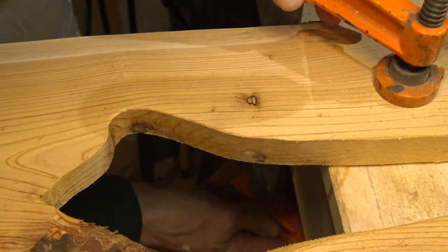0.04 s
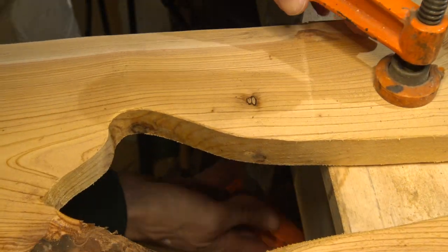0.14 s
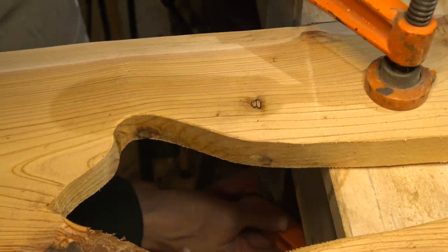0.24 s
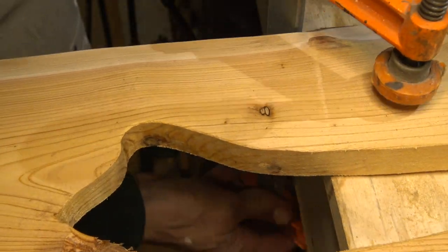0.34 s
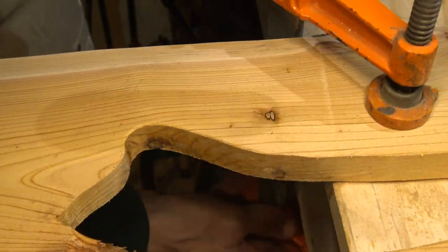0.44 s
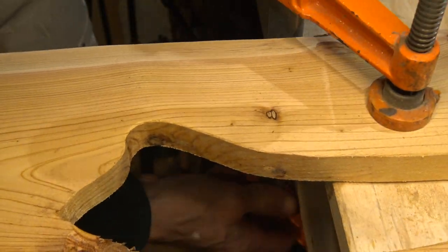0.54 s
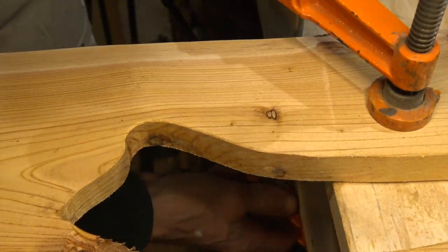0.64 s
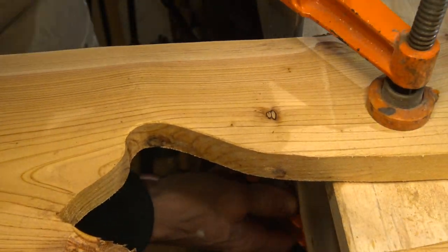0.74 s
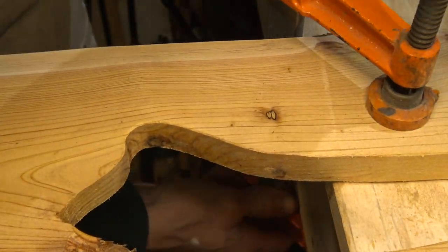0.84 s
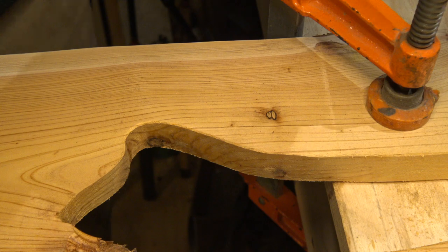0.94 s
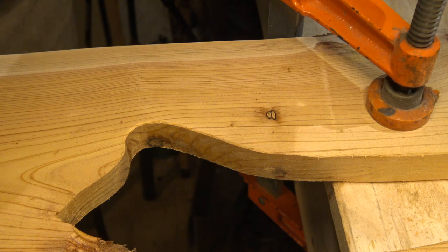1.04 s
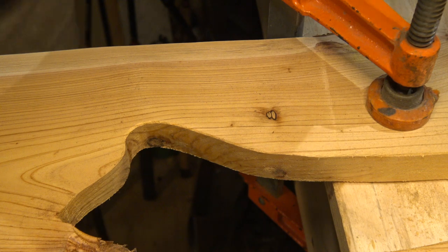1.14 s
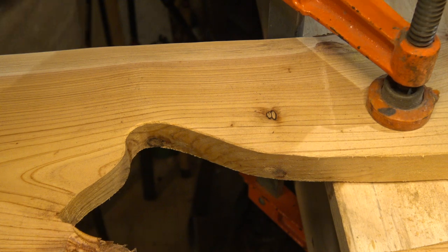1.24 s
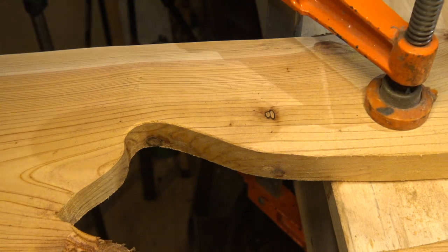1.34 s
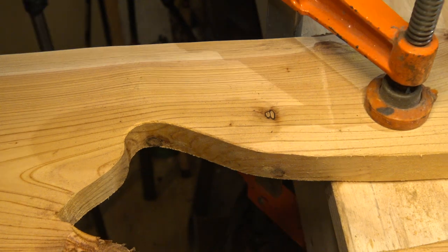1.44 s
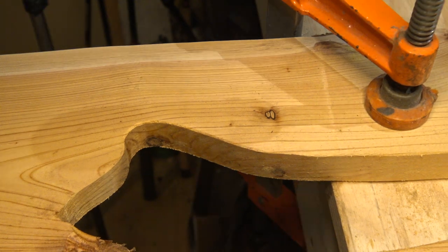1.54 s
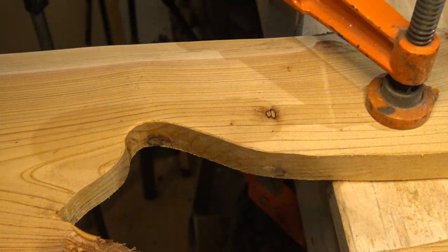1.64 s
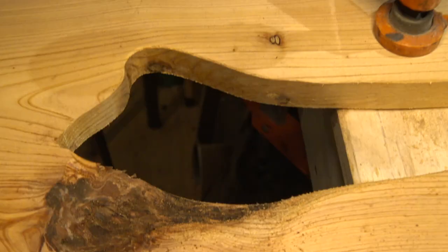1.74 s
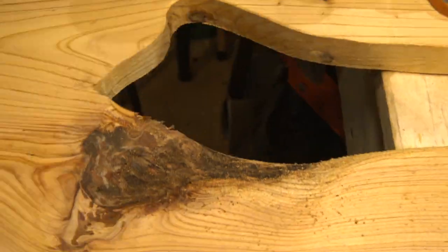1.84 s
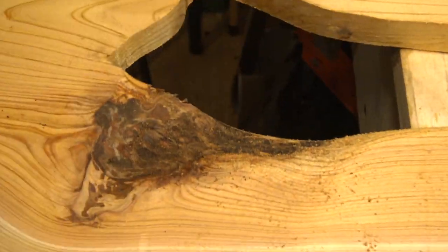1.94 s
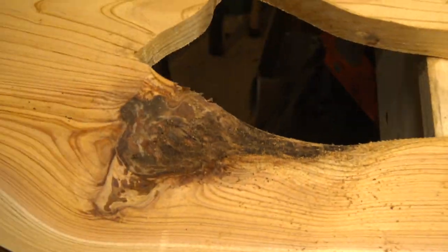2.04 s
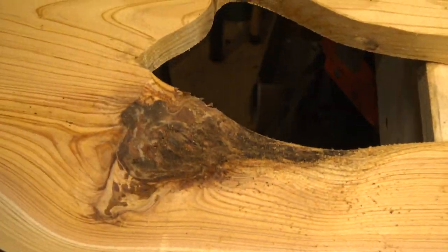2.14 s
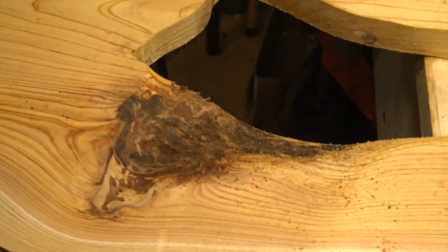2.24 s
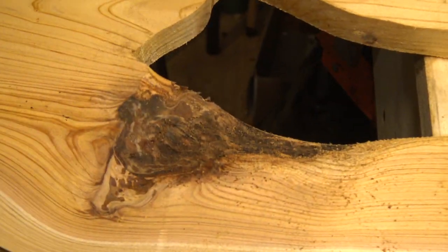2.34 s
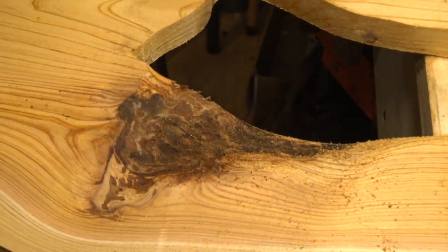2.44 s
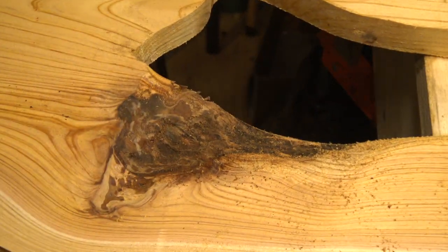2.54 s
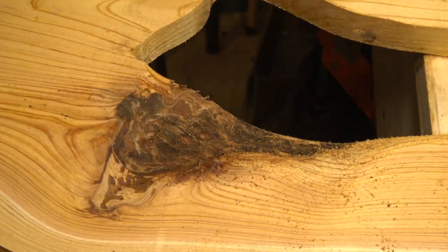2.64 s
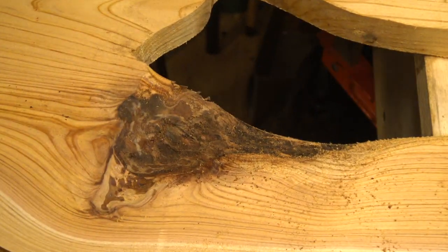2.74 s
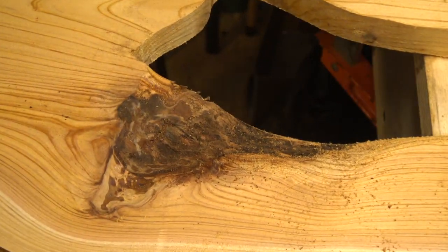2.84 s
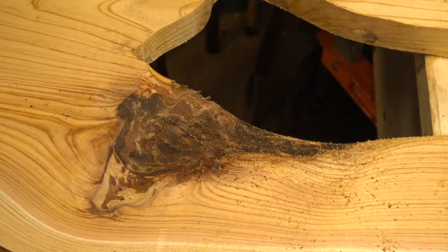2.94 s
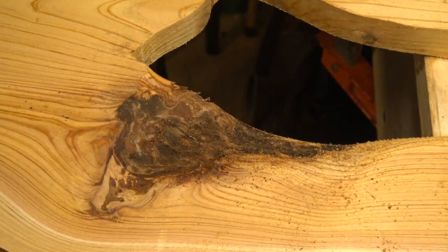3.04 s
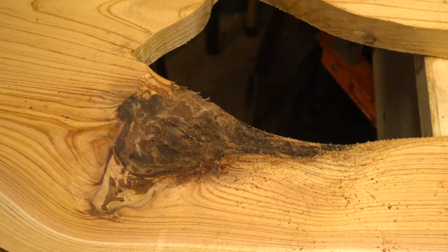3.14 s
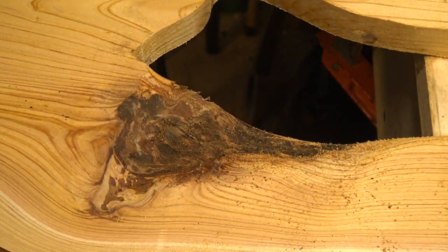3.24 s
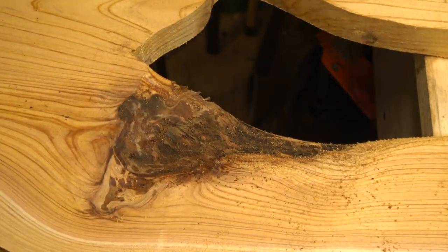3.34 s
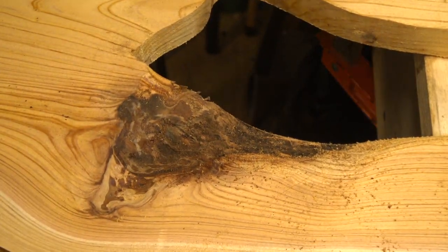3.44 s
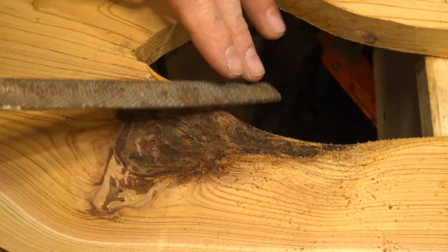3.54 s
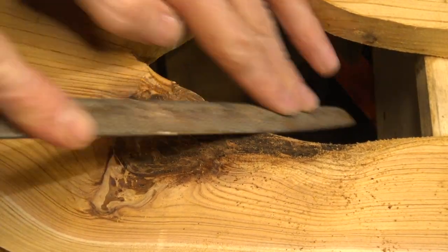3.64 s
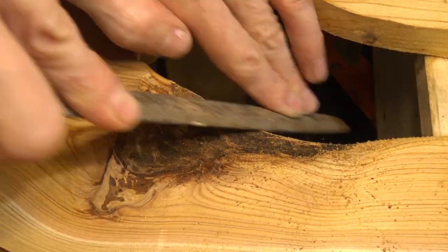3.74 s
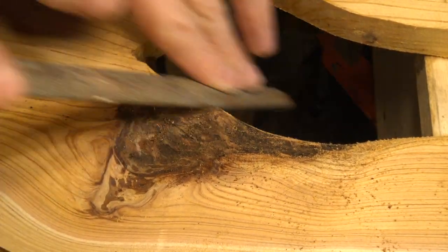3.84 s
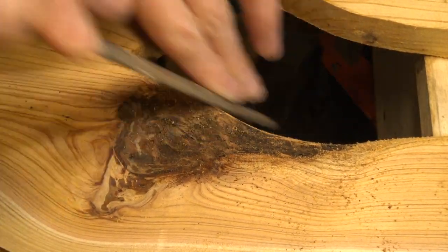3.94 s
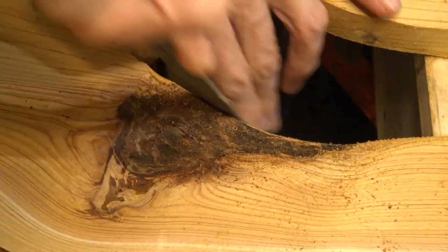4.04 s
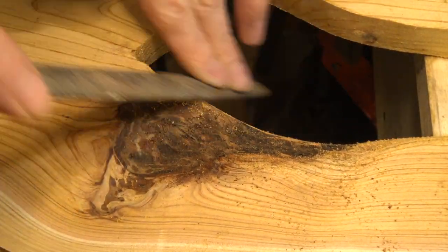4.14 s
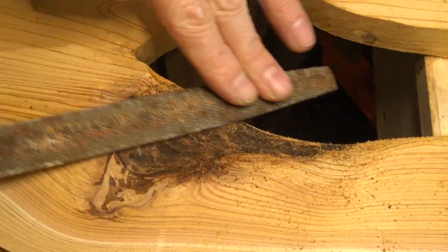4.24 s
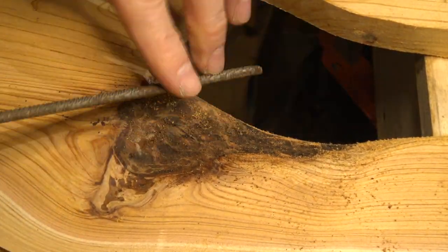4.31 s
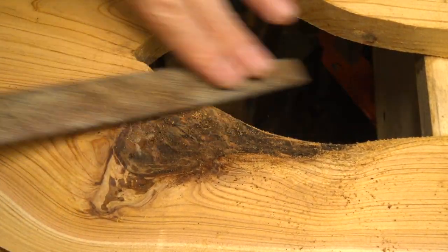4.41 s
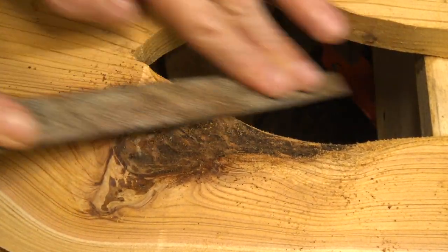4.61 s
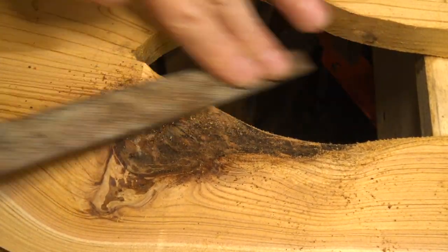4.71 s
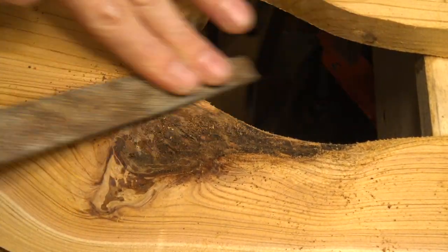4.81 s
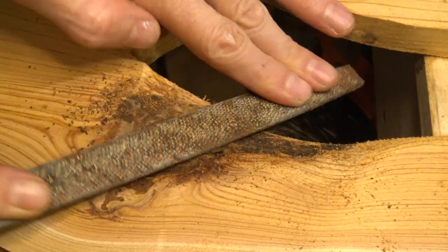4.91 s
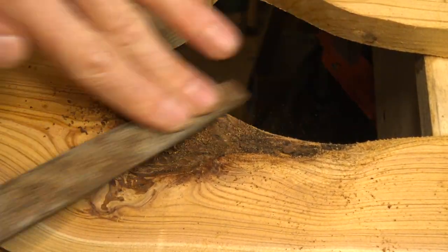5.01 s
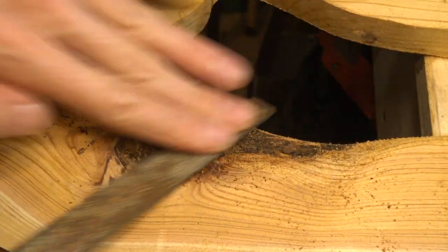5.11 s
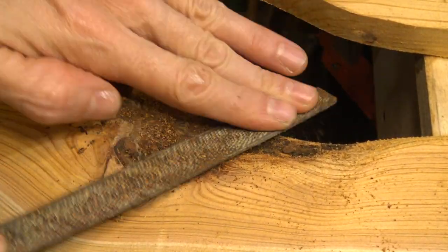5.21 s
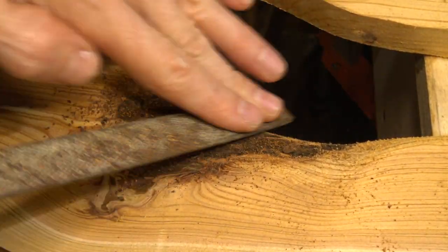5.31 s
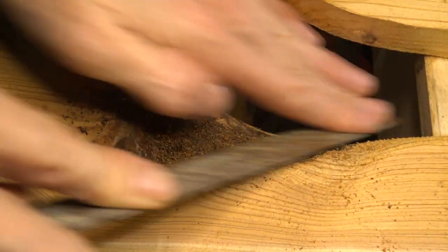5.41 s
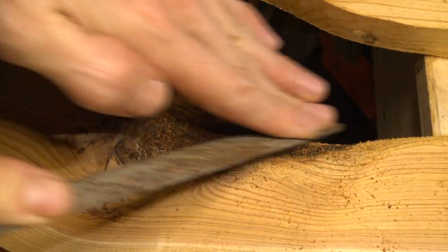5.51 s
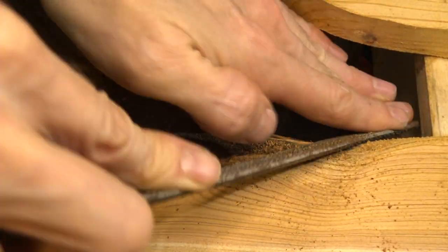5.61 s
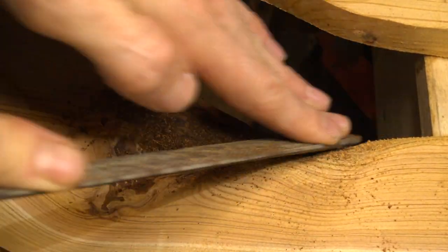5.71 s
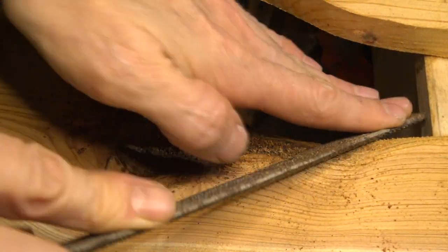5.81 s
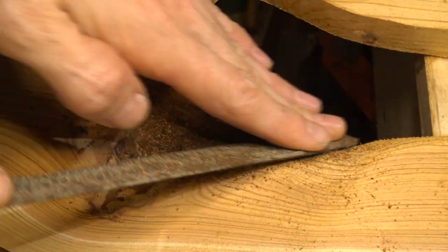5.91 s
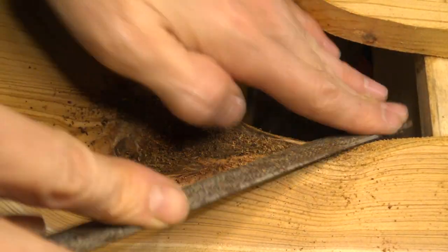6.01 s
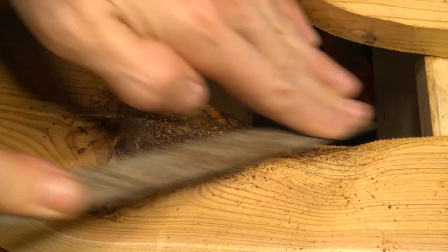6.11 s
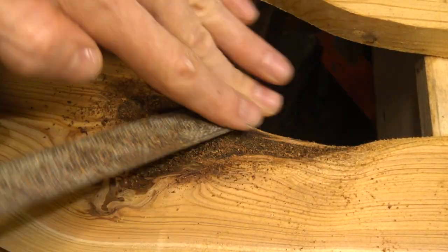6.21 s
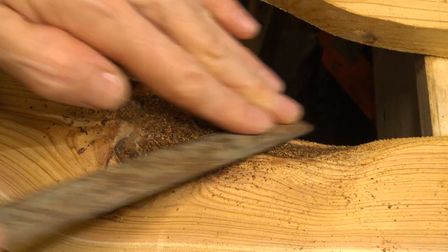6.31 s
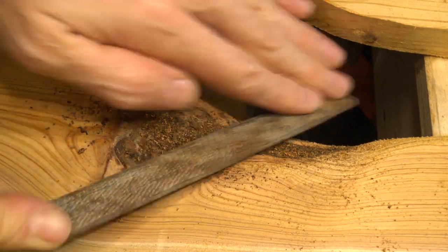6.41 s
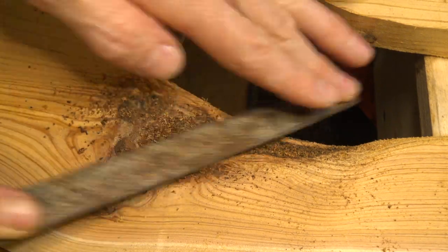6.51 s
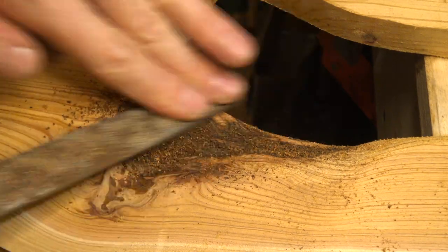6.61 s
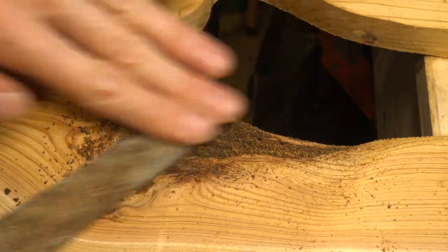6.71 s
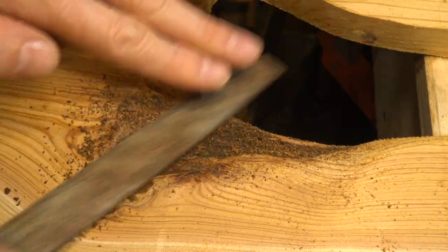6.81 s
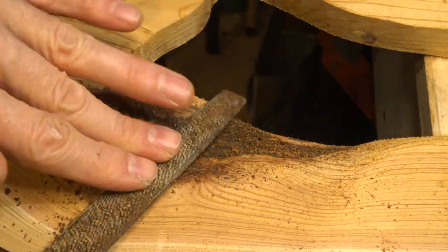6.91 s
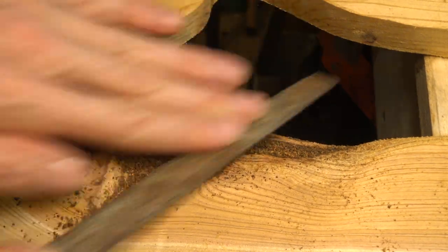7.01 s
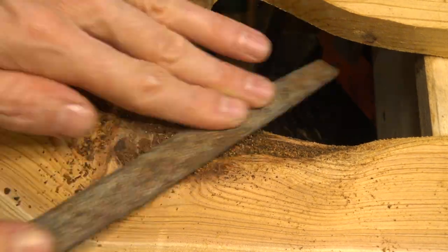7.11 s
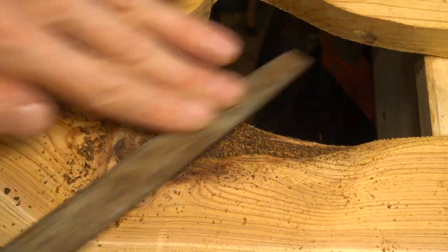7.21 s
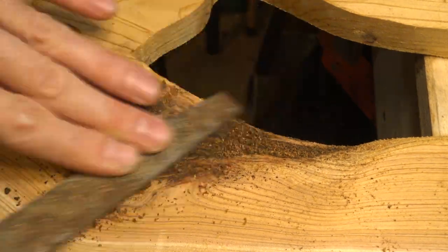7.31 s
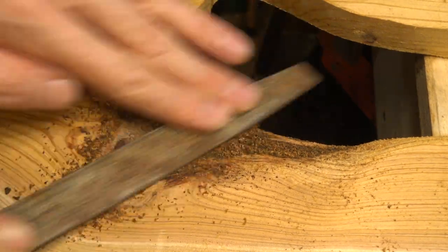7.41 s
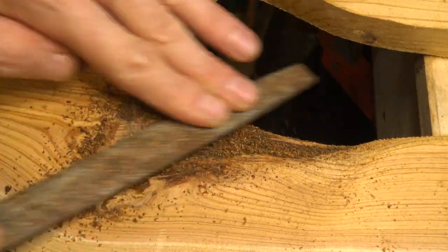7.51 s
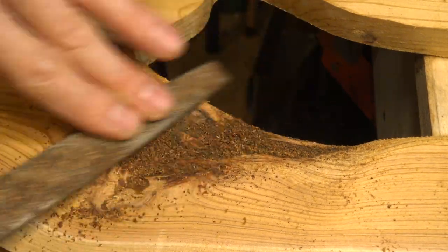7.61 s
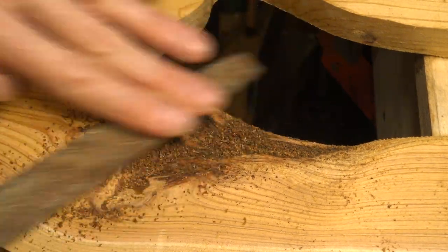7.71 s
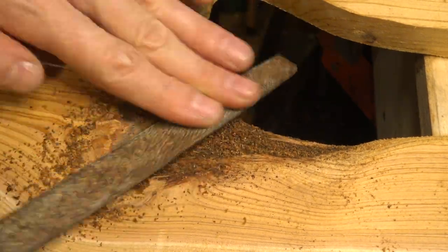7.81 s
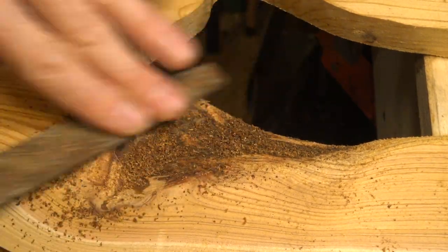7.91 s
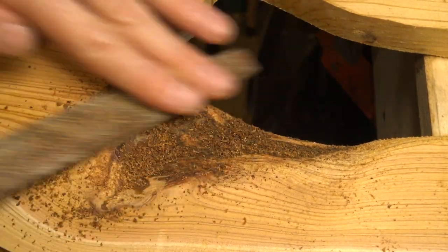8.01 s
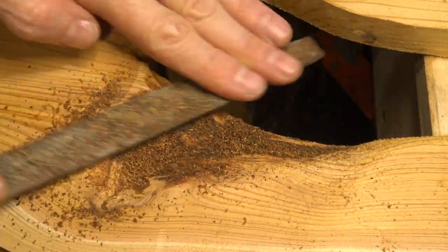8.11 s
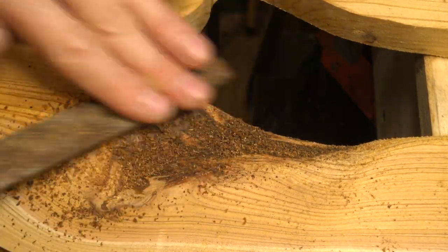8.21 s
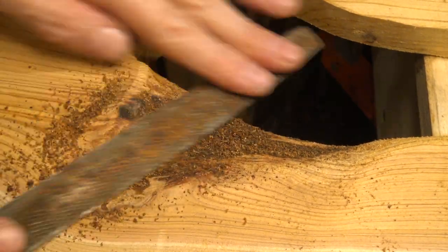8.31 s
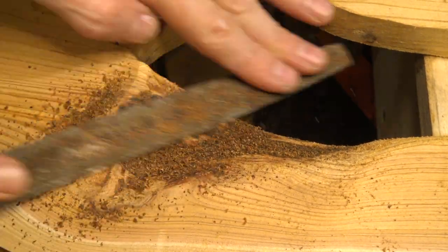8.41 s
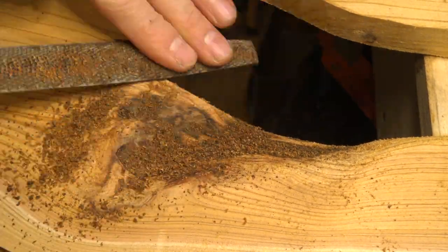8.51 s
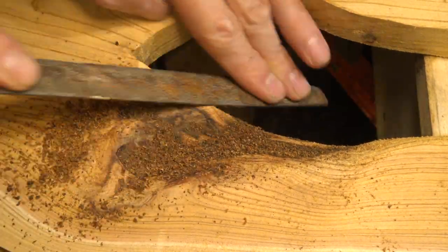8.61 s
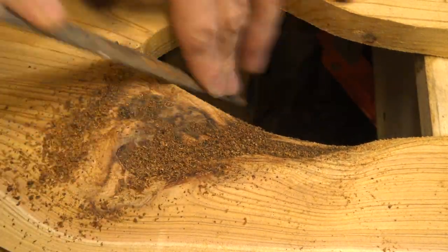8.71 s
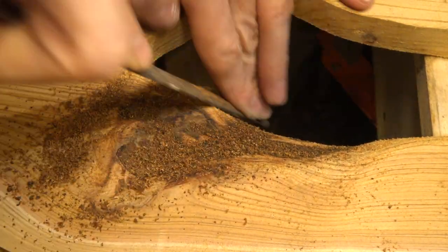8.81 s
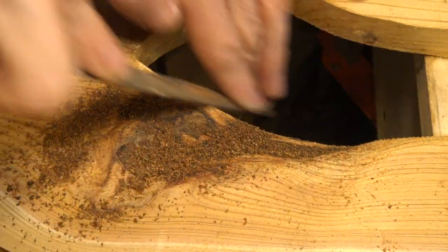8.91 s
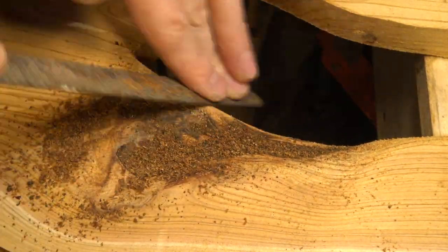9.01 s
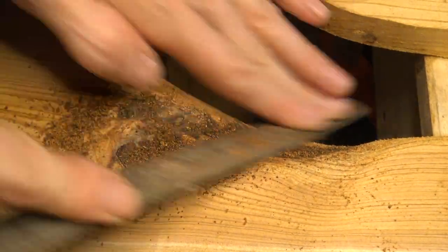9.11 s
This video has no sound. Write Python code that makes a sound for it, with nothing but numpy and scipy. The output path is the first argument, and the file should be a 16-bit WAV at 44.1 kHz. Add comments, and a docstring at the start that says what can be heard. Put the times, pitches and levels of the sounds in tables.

```python
"""Soft workshop air and a steady whine, then a clamp knocked into place on a wooden board, its screw creaking tight.
After a lull a hand file rasps a knot in the board, very fast: about 23 times a second to and fro.
Each push fizzes and ends in a thump of the board, each pull scrapes more dully.
The rasp, thumps, knocks and air are noise coloured by resonances or spectra; the whine is a stack of wavering sines.
A close pair of microphones hears it all, with a short scatter of reflections from the room."""
import sys
import numpy as np
from scipy import signal
from scipy.fft import rfft, irfft, next_fast_len
from scipy.io import wavfile
from scipy.ndimage import uniform_filter1d, minimum_filter1d

SR = 44100
rng = np.random.default_rng(int(sys.argv[2]) if len(sys.argv) > 2 else 0)


def store_wav(level_fs):
    """Save 16-bit WAV to argv[1]."""
    pcm = np.round(np.clip(np.atleast_2d(level_fs), -1, 1) * 32767)
    wavfile.write(sys.argv[1], SR, pcm.T.astype(np.int16))


N = 403515
TIME = np.arange(N) / SR
TAPS = 8192  # length of the filters, in samples
HZ = np.fft.rfftfreq(TAPS, 1 / SR)
CATCH_AT = .46  # share of a push-and-pull cycle at which the teeth catch

# ringing of the clamp under strain, as a spectrum: pitch_hz, level_db
CREAK_SPECTRUM = [(700, -40), (1150, -14), (1700, -2.5), (2150, 5.5), (2450, 1.5), (2900, -13),
                  (4400, -20.5), (5500, -12), (6400, -44)]
# resonances of the file on the wood: pitch_hz, half_width_hz, level_db
FILE_MODES = [(1010, 410, -19), (1532, 162, -5.5), (2060, 230, -3.5), (2413, 170, -7), (2904, 87, -8),
              (3381, 37, -1), (3520, 35, -4), (3690, 330, -9), (4799, 242, 1), (5300, 22, -14),
              (5390, 220, 2.5), (6040, 270, -2), (6200, 190, -5), (7100, 480, -4.5), (7915, 226, -4.5),
              (9200, 670, -13), (9230, 470, -11.5), (9730, 180, -4), (10500, 190, -9), (11200, 1900, -15),
              (14800, 3900, -11.5), (13900, 64, -20), (16100, 195, -10)]
# resonances of the clamped board: pitch_hz, half_width_hz, level_db
BOARD_MODES = [(50, 130, -54.5), (92.2, 2.7, -23), (167, 15, -26), (211, 15, -21), (293, 19.8, 0.5),
               (354, 48, -5), (432, 52, -2), (545, 31.3, 1.5), (663, 118, -7.5)]
# how hard the file shakes the board: time_s, level_db
PRESSURE = [(3.64, -32.0), (4.23, -34.5), (4.69, -23.5), (5.12, -30.5), (5.29, -24), (5.37, -31),
            (5.77, -30.5), (5.85, -36), (6.18, -29), (6.27, -32.5), (6.63, -24), (6.91, -34), (7.15, -27),
            (7.76, -24), (7.84, -27.5), (8.44, -29.5), (9.03, -34.5), (9.12, -40.5)]


def gain_of(db):
    """Decibels to a factor."""
    return 10 ** (np.asarray(db) / 20)


def evened(x):
    """Scales to rms 1."""
    return x / np.sqrt(np.mean(x ** 2) + 1e-20)


def read(points, hz):
    """A spectrum in dB, joined by straight lines over log frequency."""
    f, value = np.transpose(points)
    return np.interp(np.log(hz + 1), np.log(f + 1), value)


def curve(rows, column=1):
    """A control joined by straight lines over time."""
    columns = np.transpose(rows)
    return np.interp(TIME, columns[0], columns[column])


def wander(rate_hz):
    """Smooth chance of rms 1: noise that fades out above the rate."""
    size = next_fast_len(N)
    hz = np.fft.rfftfreq(size, 1 / SR)
    smooth = rfft(rng.standard_normal(size)) * np.exp(-(hz / rate_hz) ** 2)
    return evened(irfft(smooth, size)[:N])


def add(mix, s, sound):
    """Adds a sound into the mix at time s."""
    start = round(s * SR)
    sound = sound[max(-start, 0):]
    part = mix[max(start, 0):][:len(sound)]
    part += sound[:len(part)]


def lean(left_db):
    """Gains of the two channels for a left minus right level difference."""
    return gain_of(np.array([[1], [-1]]) * left_db / 2)


def resonances(modes):
    """Gain over frequency of a body: the powers of its modes add up."""
    power = sum(gain_of(db) ** 2 / (1 + ((HZ - hz) / width) ** 2) ** 2 for hz, width, db in modes)
    return np.sqrt(power)


def spot(modes, detune, vary_db):
    """A body's resonances for one place of contact: each mode a little shifted, stronger or weaker."""
    shifts = rng.standard_normal((len(modes), 2))
    shifted = [(hz * (1 + detune * a), width, db + vary_db * b)
               for (hz, width, db), (a, b) in zip(modes, shifts)]
    return resonances(shifted)


def ring(gain):
    """The causal impulse response that has this gain, with its energy as early as it can be."""
    cepstrum = irfft(np.log(np.maximum(gain, gain.max() * 1e-5)))
    # folding the later half onto the earlier one gives minimum phase
    cepstrum[1:TAPS // 2] *= 2
    cepstrum[TAPS // 2 + 1:] = 0
    return irfft(np.exp(rfft(cepstrum)))[:TAPS // 2]


def colour(x, gain):
    """Passes x through a body with this gain."""
    return signal.oaconvolve(x, ring(gain))[:N]


def contact(middle_s, spread_s, db, response, clump_db=2.0, rise=0.71, fall=1.46):
    """A brief swell of clumped slips rises faster than it falls and rings a body: returns start time and sound."""
    t = np.arange(-TAPS // 8, TAPS // 8) / SR
    clumps = gain_of(clump_db * evened(uniform_filter1d(rng.standard_normal(len(t)), size=70)))
    steepness = t / spread_s / np.where(t < 0, rise, fall)
    slips = clumps * rng.standard_normal(len(t)) / np.cosh(np.clip(steepness, -20, 20))
    sound = signal.fftconvolve(slips, response)
    # a longer contact carries more energy at the same level
    energy = np.sqrt(2 * np.pi) * spread_s * SR
    return middle_s + t[0], gain_of(db) * sound / np.linalg.norm(sound) * np.sqrt(energy)


def background(left_db=-1.0, spread=0.079):
    """Soft workshop air, a touch to the right, and a machine whine of wavering sines, each with its own lean."""
    # colour of the air: pitch_hz, relative_level_db
    air_spectrum = [(45, -49), (70, -40), (100, -21.5), (300, -10), (420, -10.5), (640, -0.5), (930, -8.5),
                    (1550, -4.5), (2300, -14), (3900, -20.5), (5200, -21), (13500, -26), (16000, -30)]
    # partials of the whine: pitch_hz, relative_level_db, wavering_db (rms; its sign is free), left_minus_right_db
    partials = [(672.5, -9, 3.8, -1), (1370, -19.5, 6, 5), (1546, -2.5, 0.74, 3), (1968, -27, 0, 11),
                (2310, -19.5, -1.5, 4), (4632, -19.5, 2, -4)]
    # strength of the whine: time_s, level_db
    whine_strength = [(0, -44.5), (.6, -44), (1.2, -43), (1.7, -46), (2.45, -45.5), (2.65, -42.5),
                      (3.5, -43.5), (9.15, -44.5)]
    air_db = -46.5
    air = [gain_of(air_db) * colour(rng.standard_normal(N), evened(gain_of(read(air_spectrum, HZ))))
           for _ in range(2)]
    clock = TIME + np.cumsum(0.000653 * wander(4.23)) / SR  # all partials drift in pitch together
    whine = 0
    for hz, db, waver_db, side_db in partials:
        tone = gain_of(waver_db * wander(6.9)) * np.sin(2 * np.pi * hz * clock)
        whine = whine + lean(side_db) * gain_of(db) * evened(tone)
    wide_air = lean(left_db) * air[0] + spread * np.array([air[1], -air[1]])
    return wide_air + gain_of(curve(whine_strength)) * whine


def handled(events, detune=0.017):
    """Contacts (middle_s, spread_s, thud_db, creak_db, hiss_db) sound board, clamp and surface, each detuned."""
    # thud of the board: pitch_hz, level_db
    thud_spectrum = [(35, -38), (110, -31), (250, -15), (330, 1), (440, -0.5), (650, 0), (850, -2),
                     (1100, -11.5), (1500, -32.5)]
    # hiss of the surface: pitch_hz, level_db
    hiss_spectrum = [(2200, -17), (3400, -4.5), (4600, -5), (5500, -5.5), (6600, -6), (8500, -2.5),
                     (11000, -5), (13300, -5), (16000, -10.5)]
    out = np.zeros(N)
    for s, spread_s, *levels in events:
        pitch = np.exp(detune * rng.standard_normal())
        for db, spectrum in zip(levels, (thud_spectrum, CREAK_SPECTRUM, hiss_spectrum)):
            response = ring(gain_of(read(spectrum, HZ / pitch)))
            add(out, *contact(s - spread_s / 3, spread_s, db, response))
    return out


def knocks(creak_db=-9):
    """The clamp knocks and slides on the board: mostly thud, and the clamp rings a little with it."""
    # blows of the clamp on the board: middle_s, spread_s, thud_db, hiss_db
    blows = [(0.0178, 0.002, -31, -59), (0.0902, 0.0016, -31, -45), (.103, 0.0066, -36.5, -51),
             (0.1948, 0.0017, -31.5, -39.5), (0.208, 0.00097, -29, -44), (0.24, 0.0084, -37.5, -60),
             (0.298, 0.0042, -34.5, -60), (0.366, 0.0024, -16, -38), (0.4493, .0036, -22.5, -26),
             (0.5537, 0.0033, -29.5, -60), (2.536, .002, -41, -59), (2.619, 0.0037, -42.5, -41)]
    return handled((s, spread_s, db, db + creak_db, hiss_db) for s, spread_s, db, hiss_db in blows)


def creaks(thud_db=-23.0, thud_follow=0.34, hiss_db=-14):
    """The clamp creaks under strain; a harder creak is brighter, as the thud grows much less than the ring."""
    # hard slips of the clamp: middle_s, spread_s, level_db
    strains = [(0.7245, 0.0031, -22), (0.7888, 0.0053, -30), (0.8538, 0.0029, -31), (0.8674, .0012, -29),
               (0.918, 0.0012, -22), (.928, 0.0026, -31), (0.946, .0046, -34), (1.0109, 0.0031, -23.5),
               (1.093, 0.002, -20), (1.1215, 0.0017, -20), (1.181, 0.0018, -19), (1.2045, 0.0022, -19),
               (1.275, 0.0037, -19), (1.343, 0.0035, -33), (3.3926, 0.00062, -25.5)]
    return handled((s, spread_s, thud_db + thud_follow * db, db, db + hiss_db) for s, spread_s, db in strains)


def screw(db=-41, scatter_db=3, spread_s=.002, count=20):
    """Between the hard creaks the clamp's thread chatters in small random slips."""
    # the screw turns: start_s, end_s
    turning_s = (.68, 1.26)
    out, response = np.zeros(N), ring(gain_of(read(CREAK_SPECTRUM, HZ)))
    chances = rng.standard_normal((count, 2))
    for s, (shift, size) in zip(np.linspace(*turning_s, count), chances):
        add(out, *contact(s + 0.0068 * shift, spread_s, db + scatter_db * size, response))
    return out


def ticks(thud_db=-17, creak_db=-11):
    """Light ticks and brushes on the wood stay on the surface, with little body."""
    # light touches: middle_s, spread_s, level_db
    touches = [(1.3756, .0069, -38), (1.7002, 0.00027, -29), (1.822, 0.00041, -37.5), (1.849, 0.00063, -37),
               (2.4557, 0.00037, -30), (2.586, 0.0055, -44.5), (3.3597, 0.0055, -41.5)]
    return handled((s, spread_s, db + thud_db, db + creak_db, db) for s, spread_s, db in touches)


def rumble(hz=92, width_hz=9):
    """A low rumble, noise through one narrow resonance, swells and fades now and then."""
    # swells: middle_s, spread_s, level_db
    swells = [(1.48, 0.14, -63), (2.65, 0.11, -66), (4.85, 0.27, -60.5), (6.6, 0.63, -66),
              (8.1, 0.25, -60.5)]
    swell = sum(gain_of(db) * np.exp(-((TIME - s) / spread_s) ** 4) for s, spread_s, db in swells)
    return swell * evened(colour(rng.standard_normal(N), resonances([(hz, width_hz, 0)])))


def set_down(spread_s=0.0012, thud_db=-8):
    """The file is set down: a sharp tap rings its own resonances, with a thud of the board."""
    # taps of steel on wood: middle_s, level_db
    taps = [(3.556, -17), (3.613, -16), (4.395, -16.5), (6.3, -26), (6.986, -17), (8.3, -17)]
    out = np.zeros(N)
    for s, db in taps:
        add(out, *contact(s, spread_s, db, ring(resonances(FILE_MODES))))
        add(out, *contact(s, spread_s, db + thud_db, ring(resonances(BOARD_MODES))))
    return out


def push_starts(uneven_s=0.00075):
    """The moment each cycle begins: evenly spaced within each run, but the hands come a little early or late."""
    # runs of even pace, each lasting until the next: start_s, number of push-and-pull cycles
    pace = [(3.572, 8), (3.928, 9), (4.293, 3), (4.43, 8), (4.754, 15), (5.392, 13), (5.908, 7), (6.198, 4),
            (6.387, 9), (6.78, 4), (6.993, 25), (8.085, 4), (8.251, 2), (8.336, 6), (8.59, 9), (8.958, 5),
            (9.183, 0)]
    runs = [np.linspace(s, until, cycles, endpoint=False)
            for (s, cycles), (until, _) in zip(pace, pace[1:])]
    starts = np.append(np.concatenate(runs), pace[-1][0])
    return starts + uneven_s * rng.standard_normal(len(starts))


def touch(filing_from_s=3.602):
    """How firmly the file lies on the wood, 0-1."""
    # the file lifts and only grazes the wood: start_s, end_s, level_db
    lifts = [(4.342, 4.388, -37), (5.8, 5.823, -3), (6.278, 6.292, -19), (6.946, 6.986, -17),
             (8.269, 8.332, -13.5)]
    lift_db = sum(db * ((TIME > a) & (TIME < b)) for a, b, db in lifts)
    return uniform_filter1d((TIME > filing_from_s) * gain_of(lift_db), size=60)


def rasp(cycles, touching, rest=0.11, flatten=2.56, steep=2.28, force_db=0.72, bite_db=1.43, clump_db=2.0,
         trims_db=(0, .3, .2), follow=(.55, 1, 1.2), count=8):
    """Teeth tear fibres while the file moves and fall quiet as it turns; the treble follows the speed most."""
    # rasp on the push, before the trims: time_s, growl_db, scrape_db, fizz_db
    push_levels = [(3.64, -29.5, -23.5, -27.5), (4.07, -37, -25.0, -25.5), (4.15, -27, -23, -28.5),
                   (4.23, -37, -33, -28), (4.45, -22, -26.5, -29.5), (4.69, -32.5, -29, -25),
                   (5.29, -32, -23.5, -27.0), (5.61, -29, -28.5, -23), (5.85, -34.0, -29, -25.5),
                   (5.93, -29.5, -22, -25.5), (6.01, -34.5, -26.5, -28.0), (6.71, -30, -30, -26),
                   (6.81, -27, -24.0, -31), (7.32, -37, -28.5, -28.5), (7.5, -30.5, -25, -28),
                   (9.12, -31.5, -23.5, -28.0)]
    # rasp on the pull, before the trims: time_s, growl_db, scrape_db, fizz_db
    pull_levels = [(3.64, -34.5, -27, -35), (4.15, -33, -28, -38), (4.32, -26.5, -22, -32),
                   (5.12, -31.5, -24.5, -31.5), (5.2, -31.5, -21.5, -30.0), (5.53, -32.5, -27, -32),
                   (5.69, -34.5, -24, -29), (5.77, -38, -27, -36.0), (6.18, -29, -24.0, -27),
                   (6.27, -28.5, -20, -35.0), (6.63, -32.5, -24.0, -27), (6.71, -30.5, -21.5, -31.5),
                   (7.67, -29.5, -21.5, -30.5), (8.61, -31, -26.5, -27.5), (8.69, -28.5, -29.5, -44),
                   (9.12, -33.5, -24.5, -30)]
    # borders between the bands: growl_to_scrape_hz, scrape_to_fizz_hz
    split_hz = (3000, 8500)
    push_share = .54  # share of a cycle that the push lasts

    strokes = 2 * np.floor(cycles) + np.interp(cycles % 1, [0, push_share, 1], [0, 1, 2])
    stroke = strokes.astype(int)  # even on the push, odd on the pull
    speed = rest + np.tanh(flatten * abs(np.sin(np.pi * strokes)) ** steep)
    speed /= np.sqrt(np.average(speed ** 2, weights=touching))

    hard, bright = rng.standard_normal((stroke.max() + 1, 2))[stroke].T  # no two strokes are alike
    clumps = gain_of(clump_db * np.clip(wander(200), -1.6, 1.6))
    force = gain_of(force_db * hard) * evened(clumps) * touching

    low, not_high = (1 / (1 + (HZ / edge) ** 16) for edge in split_hz)
    bands = np.sqrt([low, (1 - low) * not_high, 1 - not_high])
    place = rng.integers(0, count, stroke.max() + 1)[stroke]  # each stroke meets the wood at a random spot
    bodies = [spot(FILE_MODES, detune=0.017, vary_db=2.0) for _ in range(count)]
    out = np.zeros(N)
    for k, band in enumerate(bands):
        level_db = np.where(stroke % 2, curve(pull_levels, k + 1), curve(push_levels, k + 1))
        level_db = level_db + trims_db[k] + bite_db * bright * (k - 1)  # a bright stroke trades growl for fizz
        teeth = force * gain_of(level_db) * speed ** follow[k] * rng.standard_normal(N)
        for n, body in enumerate(bodies):
            out += colour(teeth * (place == n), evened(body * band))
    return out


def boom(cycles, touching, db=-33.5, follow=0.44, swing_db=3.0):
    """The board drones under the file as noise in its resonances, most where the teeth catch late in each push."""
    pressure_db = curve(PRESSURE)
    level_db = db + follow * (pressure_db - np.average(pressure_db, weights=touching))
    shove_db = swing_db * np.cos(2 * np.pi * (cycles - CATCH_AT))
    shaking = rng.standard_normal(N) * gain_of(level_db + shove_db) * touching
    return colour(shaking, evened(resonances(BOARD_MODES)))


def jolts(starts, touching, db=3.5, scatter_db=1.56, scatter_s=0.001503, spread_s=0.0033, lead_s=0.00197):
    """Once a cycle the teeth catch and thump the board, as hard as the file is pressed; a few snag harder."""
    # harder snags, each replacing the nearest catch: time_s, level_db
    snags = [(4.268, -21.5), (4.689, -17.5), (6.627, -17.5), (7.755, -16.5), (8.102, -18.5), (8.227, -19.5),
             (8.484, -19.5), (8.986, -23)]
    late, size = rng.standard_normal((len(starts) - 1, 2)).T
    catches = starts[:-1] + CATCH_AT * np.diff(starts) + scatter_s * late
    strength_db = curve(PRESSURE) + 20 * np.log10(touching.clip(1e-5))
    levels = np.interp(catches, TIME, strength_db) + db + scatter_db * size
    for s, snag_db in snags:
        nearest = np.argmin(abs(catches - s))
        catches[nearest], levels[nearest] = s, snag_db
    out = np.zeros(N)
    for s, level_db in zip(catches, levels):
        response = ring(spot(BOARD_MODES, detune=.007, vary_db=1.0))
        add(out, *contact(s - lead_s, spread_s, level_db, response))
    return out


def workshop(x, t60=0.1, wet_db=-15, wide_db=-21, mono_hz=300):
    """A short scatter of reflections, decaying noise; above the bass they differ between the channels."""
    t = np.arange(TAPS) / SR
    tails = rng.standard_normal((2, TAPS)) * gain_of(-60 * t / t60) * (t > .002)
    mid, side = (signal.oaconvolve(x, tail / np.linalg.norm(tail))[:N] for tail in tails)
    side = signal.lfilter(*signal.butter(2, mono_hz, "high", fs=SR), side)
    return gain_of(wet_db) * mid + gain_of(wide_db) * np.array([side, -side])


def scene():
    """File, board and clamp in the workshop."""
    # where the file works: time_s, left_minus_right_db
    file_place = [(3.6, .2), (4.45, .5), (5.4, -.3), (5.85, -1.4), (6.1, -.3), (8.2, .5), (9.15, 0)]
    starts, touching = push_starts(), touch()
    cycles = np.interp(TIME, starts, np.arange(len(starts)))
    clamp = knocks() + creaks() + screw() + ticks()
    file = set_down() + rasp(cycles, touching)
    wood = clamp + boom(cycles, touching) + jolts(starts, touching)
    direct = lean(curve(file_place)) * file + wood
    return direct + workshop(file + wood) + background() + rumble()


def record(dry, ceiling_db=-4.0, edge_hz=15900):
    """A quick limiter holds peaks down; then a close microphone pair, each with a slight colour, and a band limit."""
    # lean of the microphone pair: pitch_hz, left_minus_right_db
    balance = [(120, 0), (380, 1.5), (700, 2.1), (1300, .6), (2300, -1.1), (4400, 0), (8100, -.9),
               (13000, 0)]
    allowed = np.minimum(gain_of(ceiling_db) / (abs(dry).max(axis=0) + 1e-9), 1)
    held = dry * uniform_filter1d(minimum_filter1d(allowed, size=91), size=91)
    edge = abs(rfft(signal.firwin(401, edge_hz, window=("kaiser", 9), fs=SR), TAPS))
    taps = np.fft.fftshift(irfft(lean(read(balance, HZ)) * edge), axes=1)[:, 1:]
    return signal.oaconvolve(held, taps, "same", axes=1)


dry = scene()
out = record(dry)
store_wav(out)
```